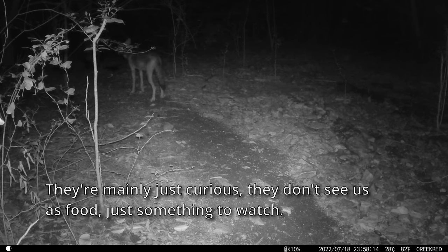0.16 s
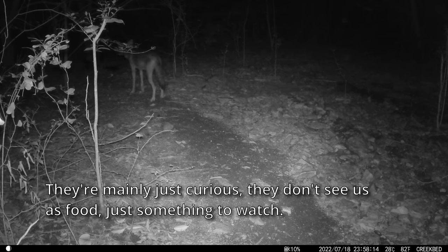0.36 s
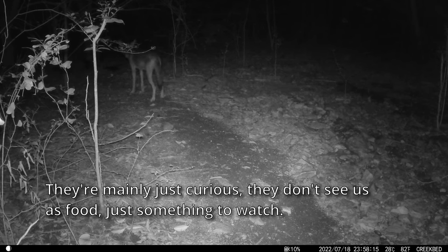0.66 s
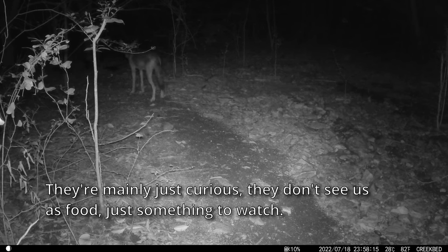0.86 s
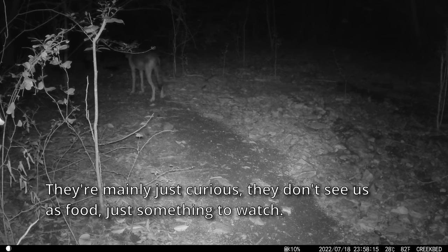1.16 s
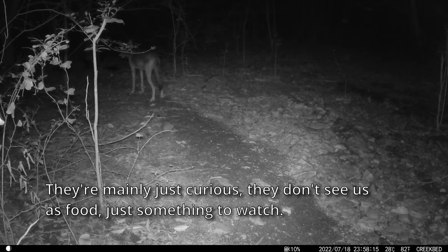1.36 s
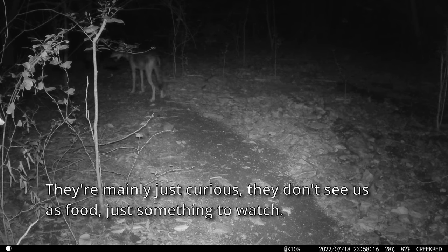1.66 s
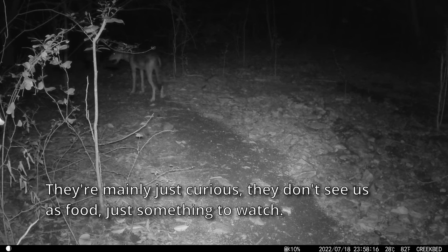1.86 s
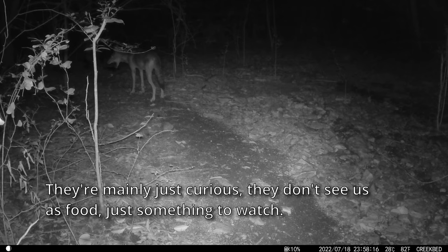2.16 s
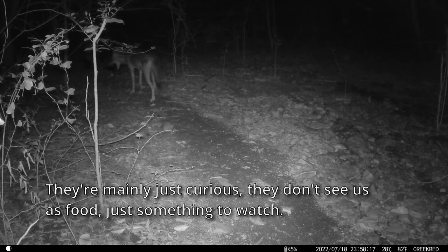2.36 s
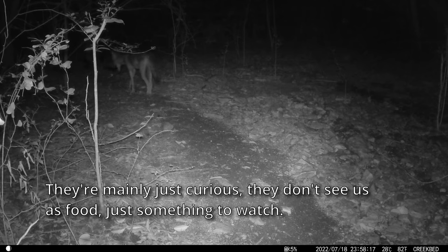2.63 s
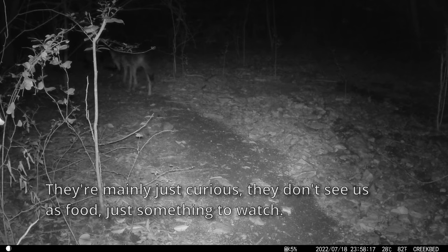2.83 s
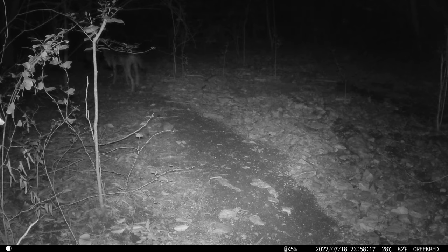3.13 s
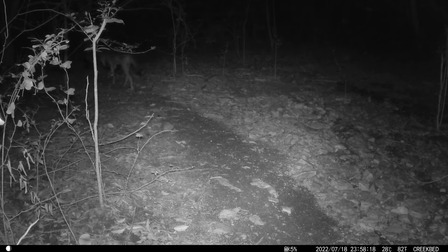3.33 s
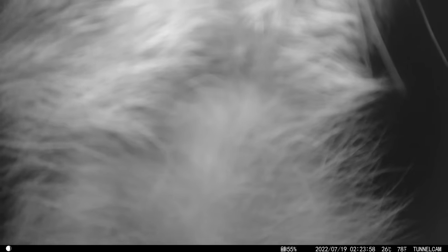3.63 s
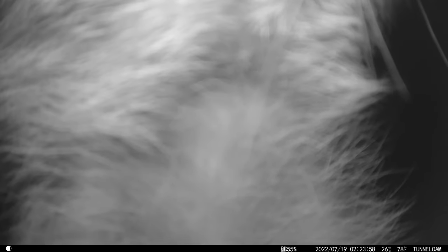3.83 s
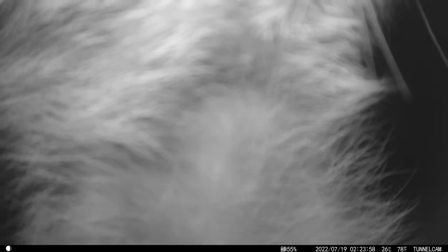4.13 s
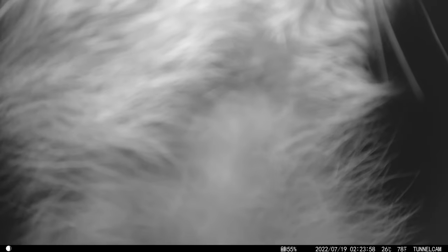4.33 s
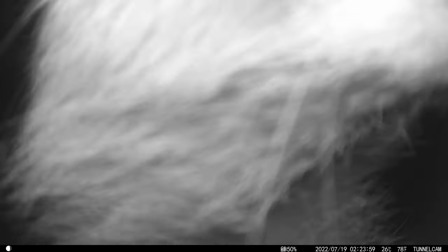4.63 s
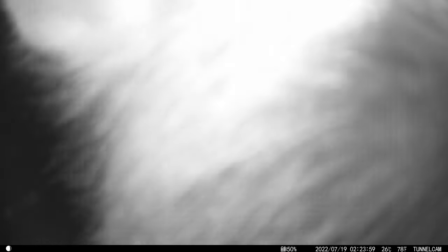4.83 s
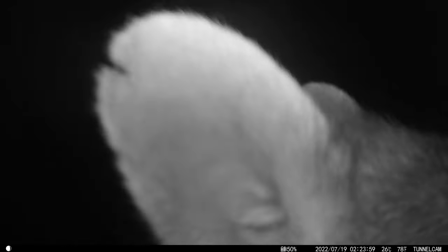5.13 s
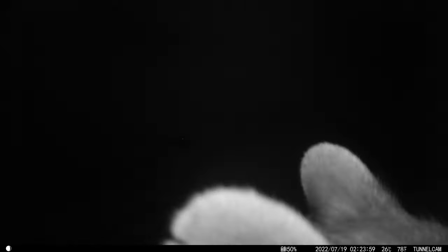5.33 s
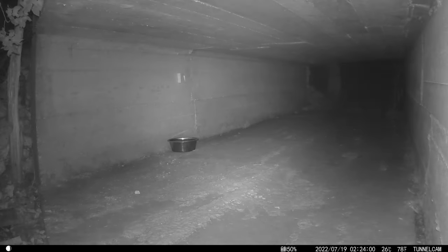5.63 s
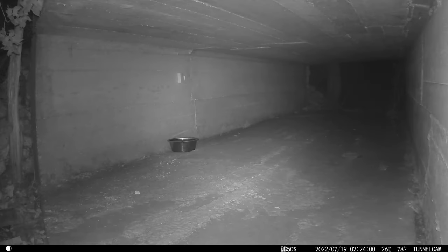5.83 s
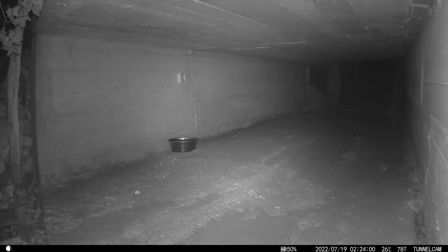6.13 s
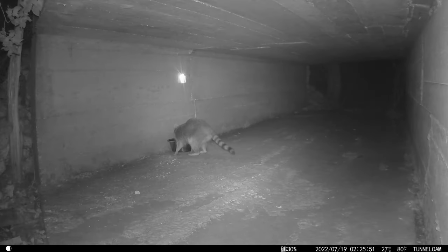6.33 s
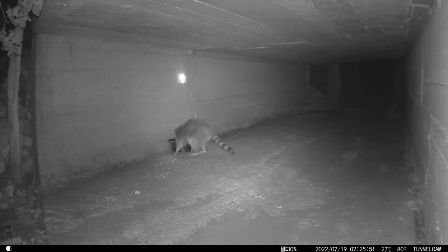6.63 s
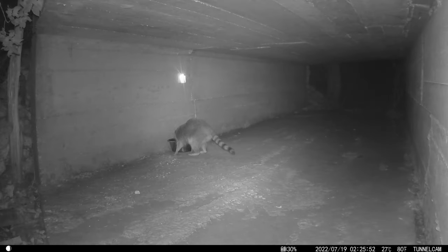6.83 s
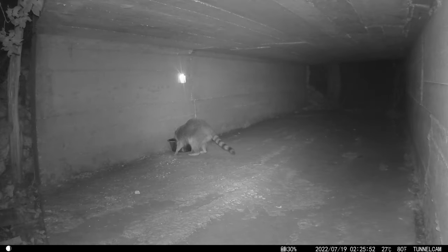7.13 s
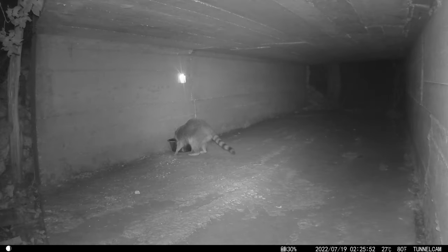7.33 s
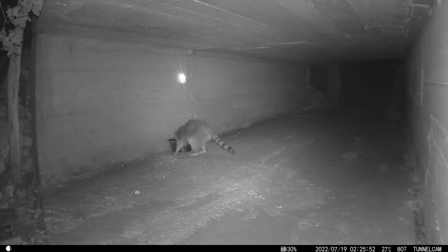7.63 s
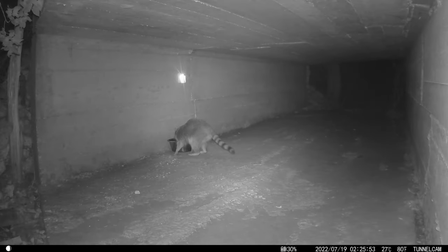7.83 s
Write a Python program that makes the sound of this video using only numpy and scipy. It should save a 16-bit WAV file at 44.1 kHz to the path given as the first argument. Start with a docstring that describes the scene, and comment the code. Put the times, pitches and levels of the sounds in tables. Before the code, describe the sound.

From 0 to 3.47 s, a night wood: a pure, buzzing tree cricket trill near 4.2 kHz runs steadily, sagging slightly before stopping at 2.4 s, while a second, slightly higher trill fades in from 1.2 s and takes over. Far insects rasp in soft swells about every half second near 8 kHz, over low rumble and hiss; faint leaf ticks at 2.1, 2.6 and 2.7 s. A tiny gap, then pops at 3.48 and 3.55 s, background surging and settling, smaller pops, and a faint fizzy whistle diving and climbing from 3.8 to 4.3 s. In the concrete tunnel a lower trill near 3.95 kHz continues, blurred by echo, clearer after 6.2 s. Short falling double chirps repeat every 0.3 s, growing louder. Deep rumble swells around 6.5 s; faint food clicks at 6.2, 6.9 and 7.8 s. Left channel only, ending mid-trill at 8 s.

```python
"""A wood at night, then a concrete tunnel, picked up by two trail cameras in turn, on the left channel only.
In the wood two tree crickets trill, each a comb of tones set by its wing strokes, over far rasping insects.
The second camera starts with decaying voltage steps heard as pops, and a whistle whose pitch dives and climbs.
In its tunnel come lower trills, a cricket chirping in pairs of falling tones, and a raccoon picking at food,
made of short noise bursts. Low rumble, air and hiss are shaped noise. scene() doubles all levels at the end."""
import sys
import numpy as np
from scipy import signal
from scipy.fft import rfft, irfft, next_fast_len
from scipy.io import wavfile
from scipy.ndimage import map_coordinates

SR = 44100
rng = np.random.default_rng(int(sys.argv[2]) if len(sys.argv) > 2 else 0)


def pcm_store(signal):
    """Save signal as 16-bit PCM."""
    levels = np.round(np.clip(np.atleast_2d(signal), -1, 1) * 32767)
    wavfile.write(sys.argv[1], SR, levels.astype(np.int16).T)


N = 352359
T = np.arange(N) / SR  # time of every sample (s)
WOOD_END, TUNNEL_START = 3.467, 3.484  # (s)


def gain_of(db):
    """Turns decibels into an amplitude factor."""
    return 10 ** (np.asarray(db) / 20)


def evened(x):
    """Scales a sound to an average (rms) strength of 1."""
    return x / np.sqrt(np.mean(x ** 2) + 1e-20)


def curve(rows):
    """Joins (time, value) rows by straight lines over the whole time."""
    times, values = np.transpose(rows)
    return np.interp(T, times, values)


def gate(start, end, fade):
    """Opens from start and is shut at end, with a straight fade at each side."""
    return np.clip(np.minimum(T - start, end - T) / fade, 0, 1)


def swell(centre, length):
    """A smooth hump of height 1; length is its width at half height."""
    return .5 ** ((2 * (T - centre) / length) ** 2)


def wander(rate):
    """A smooth random curve of rms 1 through `rate` random points a second."""
    knots = rng.standard_normal(8192)
    return evened(map_coordinates(knots, [T * rate], order=3, mode="wrap"))


def noise(points):
    """Random noise filtered to follow (Hz, dB) points, at rms 1."""
    hz, db = np.transpose(points)
    size = 2 * next_fast_len(N)
    bin_hz = np.fft.rfftfreq(size, 1 / SR)
    shape_db = np.interp(np.log(bin_hz + 1), np.log(hz + 1), db)  # straight lines over log pitch
    spectrum = rfft(rng.standard_normal(N), size)
    return evened(irfft(spectrum * gain_of(shape_db))[:N])


def band(hz, width):
    """Noise in a bell-shaped band around hz: two slow noises ride on a cosine and a sine."""
    turn = 2 * np.pi * hz * T
    bell = np.exp(-(np.arange(-SR // 10, SR // 10) / SR * width * np.pi) ** 2)
    a, b = signal.oaconvolve(rng.standard_normal((2, N)), bell[None], "same")
    return evened(a * np.cos(turn) + b * np.sin(turn))


def echoes(x, t60, wet_db):
    """Adds a tail of scattered reflections that dies by 60 dB in t60 seconds."""
    t = np.arange(SR // 2) / SR
    tail = rng.standard_normal(len(t)) * gain_of(-60 * t / t60) * (t > .003)
    tail = tail / np.linalg.norm(tail)
    return x + gain_of(wet_db) * signal.oaconvolve(x, tail)[:N]


WAKE_S, SETTLE_S = 0.11, 0.4  # rise to the loudest point, then decay time
LOUD_START_DB, HISS_START_DB = 11, 6  # how far above the steady level it climbs


def settling(excess_db):
    """As the second camera comes on, the level climbs too high, then sinks to its steady value."""
    since = np.maximum(T - TUNNEL_START, 0)
    rise = np.minimum(since / WAKE_S, 1)
    fall = np.exp(-np.maximum(since - WAKE_S, 0) / SETTLE_S)
    return gain_of(excess_db * rise * fall)


def trill(stroke_hz, lines, sweep, jitter, uneven_db):
    """Like wing strokes make a comb of tones; higher ones come earlier, so each stroke sags in pitch."""
    strokes = np.cumsum(stroke_hz) / SR + jitter * wander(40)  # wing strokes made so far
    lowest, line_db = lines
    multiples = round(lowest) + np.arange(len(line_db))
    song = np.zeros(N)
    for multiple, gain in zip(multiples, gain_of(line_db)):
        offset = sweep * (multiple - multiples.mean()) ** 2 / 2
        song += gain * np.cos(2 * np.pi * (multiple * strokes + offset))
    return evened(song) * gain_of(uneven_db * wander(50))


# Pitch of the two crickets in the wood; stroke rates follow it: start_s, pitch_hz
LOW_PITCH = [(0, 4157), (.25, 4186), (.95, 4218), (2.0, 4158), (2.4, 4083)]
HIGH_PITCH = [(1.62, 4266), (2.05, 4240), (2.5, 4266), (3.2, 4253)]
# Tones of each song: lowest multiple of the stroke rate, then level_db of it and each next multiple
LOW_TONES = (44, [-28, -20, -8, -3, -4, 0, -3, -9, -19, -16, -23, -21, -27, -23])
HIGH_TONES = (46, [-24, -16, -16, -12, 0, -8, -16, -22, -28, -26])
LOW_SONG_DB, LOW_TIRES_DB_PER_S = -51, 1.24  # level at the start, and how fast it drops
HIGH_SONG_DB, HIGH_TIRES_DB_PER_S = -48.5, 2
HIGH_ENTERS_S, HIGH_RISE_S = 1.16, 0.75
CHORUS_DB, SONG_DRIFT_DB = -56, .7  # drift: random sway of every song


def wood_crickets():
    """One wing-stroke trill slows and stops while a higher one takes over; a noise band blurs far ones."""
    # the pitch heard is the 49th or 50th multiple of the stroke rate
    low = trill(curve(LOW_PITCH) / 49, LOW_TONES, sweep=.12, jitter=.0005, uneven_db=.6)
    low *= gate(-1, 2.41, .05)
    high = trill(curve(HIGH_PITCH) / 50, HIGH_TONES, sweep=.13, jitter=.0009, uneven_db=1.3)
    high *= gate(HIGH_ENTERS_S, 9, HIGH_RISE_S)
    far = band(4220, 233)
    low_db = LOW_SONG_DB - LOW_TIRES_DB_PER_S * T
    high_db = HIGH_SONG_DB - HIGH_TIRES_DB_PER_S * (T - HIGH_ENTERS_S)
    songs = ((low, low_db), (high, high_db), (far, CHORUS_DB))
    return sum(song * gain_of(db + SONG_DRIFT_DB * wander(3.42)) for song, db in songs)


# Steady loudness of the whole tunnel trill: start_s, level_db
TUNNEL_LEVEL = [(3.5, -53.5), (4.1, -50.5), (5.2, -53.5), (6.15, -51), (6.45, -49), (7.99, -49.5)]
# Part of the trill's power that comes from the nearest cricket: start_s, share (0-1)
NEAREST_SHARE = [(6.1, 0.34), (6.35, 0.65)]
# Tones of the nearest and the other crickets: lowest multiple of the stroke rate, then level_db of each
NEAREST_TONES = (47, [-22, -8, -9, -1, 0, -3, -16, -18, -25])
NEIGHBOUR_TONES = (48, [-24, -14, -5, 0, -6, -16])
TUNNEL_HZ, TUNNEL_DRIFT_HZ = 3948, 4  # pitch of the nearest cricket and its random drift
NEIGHBOUR_STROKES_HZ, NEIGHBOUR_DRIFT_HZ = (76.0, 77.1), .35


def tunnel_crickets():
    """The nearest trill stands out of neighbours smeared by echoes from the concrete walls."""
    stroke_hz = (TUNNEL_HZ + TUNNEL_DRIFT_HZ * wander(3)) / 51  # the pitch is the 51st multiple
    near = trill(stroke_hz, NEAREST_TONES, sweep=.22, jitter=.0011, uneven_db=.8)
    neighbours = np.zeros(N)
    for hz in NEIGHBOUR_STROKES_HZ:
        drifting_hz = hz + NEIGHBOUR_DRIFT_HZ * wander(6)
        neighbours += trill(drifting_hz, NEIGHBOUR_TONES, sweep=0.17, jitter=0.0067, uneven_db=0.7)
    blur = evened(echoes(neighbours, t60=0.17, wet_db=-2.5))
    share = curve(NEAREST_SHARE)
    return gain_of(curve(TUNNEL_LEVEL)) * (np.sqrt(share) * near + np.sqrt(1 - share) * blur)


# Chirps of two wing strokes: time_s (just after the start), typical peak_db of the first stroke,
# gap_s from the first stroke to the second
CHIRP_PAIRS = [(3.579, -47, 0.037), (3.8596, -45, 0.034), (4.132, -44, 0.03), (4.4164, -45, 0.033),
               (4.6937, -43.5, 0.034), (4.962, -44, .032), (5.2579, -44, 0.03), (5.5426, -42, 0.032),
               (5.8177, -41, 0.04), (6.0902, -38, 0.037), (6.549, -39, .033), (6.838, -38, 0.034),
               (7.16, -39.5, 0.029), (7.442, -37.5, 0.031), (7.741, -38, 0.031), (7.977, -38, .03)]
# Each stroke, gliding from the tunnel's start to its end: (first, last)
CHIRP_HZ, STROKE_S, STROKE_FALL_HZ = (4207, 4140), (0.023, 0.014), (170, 234)
SECOND_DB, SECOND_HZ = 1.5, 29  # the second stroke is typically louder and higher by this
STROKE_SPREAD_DB, STROKE_SPREAD_HZ, STROKE_STRETCH = 1.5, 21, 0.14  # largest random change (+ or -)


def chirper(lead=.0035, wall_delay=.0041, wall_db=-12):
    """Slow wing strokes in pairs: falling tones beat against a wall echo and grow brisker and lower."""
    out = np.zeros(N)
    chances = rng.uniform(-1, 1, (len(CHIRP_PAIRS), 2, 3))
    for (s, db, gap), chance in zip(CHIRP_PAIRS, chances):
        pitch, length, fall_hz = (np.interp(s, [TUNNEL_START, T[-1]], ends)
                                  for ends in (CHIRP_HZ, STROKE_S, STROKE_FALL_HZ))
        for second, (longer, louder, higher) in enumerate(chance):  # second is 0, then 1
            hz = pitch + second * SECOND_HZ + STROKE_SPREAD_HZ * higher
            along = np.linspace(0, 1, int(length * (1 + STROKE_STRETCH * longer) * SR))
            tone = np.sin(2 * np.pi * np.cumsum(hz + fall_hz * (.5 - along)) / SR)
            stroke_db = db + second * SECOND_DB + STROKE_SPREAD_DB * louder
            stroke = gain_of(stroke_db) * np.sin(np.pi * along) * tone
            part = out[round((s + second * gap - lead) * SR):][:len(along)]
            part += stroke[:len(part)]  # adds into out
    out += gain_of(wall_db) * np.interp(T - wall_delay, T, out)
    return echoes(out, t60=.06, wet_db=-14)


# Cracks of leaves and food: start_s, level_db before the decay, pitch_hz, width_hz, decay_s
CRACK_BURSTS = [(2.09, -58, 6980, 2500, 0.022), (2.6, -57, 6290, 1500, 0.0093), (2.73, -59, 6350, 400, .02),
                (6.228, -53.5, 296, 200, .01), (6.288, -49.5, 3040, 850, .009),
                (6.872, -52, 2525, 1700, 0.02), (6.875, -60, 607, 600, 0.016),
                (6.925, -58, 2780, 1510, 0.015), (7.775, -58, 1700, 400, 0.014)]


def cracks():
    """Paws on leaves and food being picked up make short bursts of noise that die away."""
    out = np.zeros(N)
    for s, db, hz, width, decay in CRACK_BURSTS:
        dying = gate(s, 9, 0.00078) * np.exp(-np.maximum(T - s, 0) / decay)
        out += band(hz, width) * gain_of(db) * dying
    return out


# Voltage steps as the second camera starts: start_s, height (1 = full scale), decay_s
VOLTAGE_STEPS = [(3.4802, 0.023, 0.055), (3.4846, 0.036, 0.12), (3.5487, 0.14, 0.0023),
                 (3.8145, -0.038, 0.046), (4.007, -0.019, 0.022), (4.279, 0.012, 0.0034)]
# The whistle of its settling electronics dives to nothing and climbs back
WHISTLE_START_S, WHISTLE_TURN_S, WHISTLE_END_S = 3.825, 3.992, 4.3
WHISTLE_TOP_HZ, DIVE_S, CLIMB_S, WHISTLE_DB = 14750, .115, .145, -54


def camera_start(swing_hz=3000, wobble_hz=41, fizz_db=-1):
    """Voltage steps leak away as pops; a fizzy whistle warbles down and up, most widely when low."""
    steps = np.zeros(N)
    for s, height, decay in VOLTAGE_STEPS:
        steps += height * (T >= s) * np.exp(-np.maximum(T - s, 0) / decay)
    pops = signal.lfilter(*signal.butter(1, 9000, fs=SR), steps)  # softens the edges
    away = np.where(T < WHISTLE_TURN_S, (WHISTLE_TURN_S - T) / DIVE_S, (T - WHISTLE_TURN_S) / CLIMB_S)
    hz = WHISTLE_TOP_HZ * np.tanh(away)
    looseness = 1 - np.tanh(away) ** 4 / 2
    wobble = np.sin(2 * np.pi * np.cumsum(wobble_hz + 10 * wander(40)) / SR) + 0.33 * wander(120)
    whistle = np.sin(2 * np.pi * np.cumsum(hz + looseness * swing_hz * wobble) / SR)
    fizz = np.sin(2 * np.pi * np.cumsum(hz + looseness * 2400 * wander(700)) / SR)
    sounding = gate(WHISTLE_START_S, WHISTLE_END_S, 0.0082)
    return pops + (whistle + gain_of(fizz_db) * fizz) * gain_of(WHISTLE_DB) * sounding


# Swells of the far insects, over a steady bed: centre_s, level_db
RASP_SWELLS = [(.5, -61), (1.05, -68), (1.62, -60), (2.1, -68), (2.55, -62), (3.0, -67), (3.47, -71)]
# Their spectrum: pitch_hz, level_db
RASP_SPECTRUM = [(6000, -29), (7000, -11), (7400, -2.5), (7850, 2), (8250, -5.5), (8800, -13.5),
                 (9500, -69)]
# Single far buzzes: start_s, end_s, level_db, pitch_hz
FAR_BUZZES = [(0.247, .45, -66, 7350), (.42, .6, -68, 8200), (1.08, 1.28, -67.5, 7280),
              (2.03, 2.22, -64.5, 8200), (4.88, 5.06, -74, 7300), (5.86, 6.04, -71, 7300)]
RASP_S, WOOD_RASP_DB, TUNNEL_RASP_DB = 0.17, -66, -76  # swell length, bed level in each place


def far_rasp(flutter_db=1.5):
    """Far insects rasp as a fluttering noise band that swells in the wood; single buzzes stand out."""
    buzzes = sum(band(hz, 130) * gain_of(db) * gate(start, end, 0.063)
                 for start, end, db, hz in FAR_BUZZES)
    bed = gain_of(np.where(T < WOOD_END, WOOD_RASP_DB, TUNNEL_RASP_DB)) * settling(LOUD_START_DB)
    swell_power = sum((gain_of(db) * swell(s, RASP_S)) ** 2 for s, db in RASP_SWELLS)
    level = np.sqrt(bed ** 2 + swell_power)
    return (noise(RASP_SPECTRUM) * level + buzzes) * gain_of(flutter_db * wander(60))


# Swells of deep rumble: centre_s, length_s, level_db, pitch_hz, width_hz
DEEP_SWELLS = [(2.15, 0.61, -45.5, 55, 45), (6.5, 1.0, -42.5, 36.02, 16.4)]
# Faint drones: start_s, end_s, level_db, pitch_hz, width_hz
FAINT_DRONES = [(1.2, 3.8, -49.5, 63, 9.3), (6.5, 8.3, -56.5, 133, 22), (6.5, 6.75, -71, 1120, 70),
                (0.5, 1.4, -83, 840, 77), (2.5, 3.95, -72, 1400, 120)]


def drones():
    """Faint narrow noise bands, low hums and thin higher tones, swell and fade; twice a deep rumble rises."""
    deep = sum(band(hz, width) * gain_of(db) * swell(s, length)
               for s, length, db, hz, width in DEEP_SWELLS)
    faint = sum(band(hz, width) * gain_of(db) * gate(start, end, (end - start) / 4)
                for start, end, db, hz, width in FAINT_DRONES)
    return deep + faint


# Spectra of the rumble and distant air in each place, and of the amplifier hiss: pitch_hz, level_db
WOOD_RUMBLE_SPECTRUM = [(8.8, -39), (15, -9), (43, 1), (70, -3), (135, -9.5), (154, -14), (173, -15.5),
                        (203, -23), (233, -19), (300, -30.5), (390, -73), (660, -120)]
TUNNEL_RUMBLE_SPECTRUM = [(8.8, -36), (15, -4), (47, -3), (61, -7), (76, -17.5), (152, -21), (300, -34),
                          (390, -70), (660, -120)]
WOOD_AIR_SPECTRUM = [(150, -12), (300, 0), (450, -2.5), (850, -3), (1400, -7), (2200, -12.5), (3500, -15.5),
                     (7000, -26), (12000, -60)]
TUNNEL_AIR_SPECTRUM = [(150, -45), (300, 0.5), (450, -1.5), (750, -4), (1100, -5.5), (1600, -9),
                       (3000, -12.5), (6000, -18), (12000, -48)]
HISS_SPECTRUM = [(20, -1.5), (5000, 0.5), (9500, -0.5), (10500, 0.5), (12400, 0.5), (12800, -52)]
# Steady levels in each place: rumble_db, air_db, hiss_db
WOOD_BED_DB = (-46.5, -59.5, -61.5)
TUNNEL_BED_DB = (-45, -62.5, -62.5)
HEAVE_DB = 1.0  # random sway of the rumble


def background(levels, rumble, air):
    """Low rumble heaves with the moving air, under distant air and amplifier hiss, all shaped noise."""
    rumble_db, air_db, hiss_db = levels
    low = noise(rumble) * gain_of(rumble_db + HEAVE_DB * wander(6)) * settling(LOUD_START_DB)
    wash = noise(air) * gain_of(air_db)
    hiss = noise(HISS_SPECTRUM) * gain_of(hiss_db)
    return low + (wash + hiss) * settling(HISS_START_DB)


def scene():
    """The wood, a blink of near silence, then the tunnel; the right channel stays silent."""
    wood = wood_crickets() + background(WOOD_BED_DB, WOOD_RUMBLE_SPECTRUM, WOOD_AIR_SPECTRUM)
    tunnel = (tunnel_crickets() + chirper()) * settling(LOUD_START_DB)
    tunnel += background(TUNNEL_BED_DB, TUNNEL_RUMBLE_SPECTRUM, TUNNEL_AIR_SPECTRUM)
    in_wood, in_tunnel = gate(-1, WOOD_END, 0.0013), gate(TUNNEL_START, 9, 0.02)
    left = wood * in_wood + tunnel * in_tunnel
    left += (far_rasp() + drones()) * (in_wood + in_tunnel)
    left += cracks() + camera_start()
    return np.array([2 * left, np.zeros(N)])


EDGE_HZ = 15800  # upper limit of the sound


def record(dry):
    """A steep low-pass filter takes away what lies above the upper limit."""
    lowpass = signal.firwin(511, EDGE_HZ, window=("kaiser", 9), fs=SR)
    return signal.oaconvolve(dry, lowpass[None], "same")


dry = scene()
out = record(dry)
pcm_store(out)
```